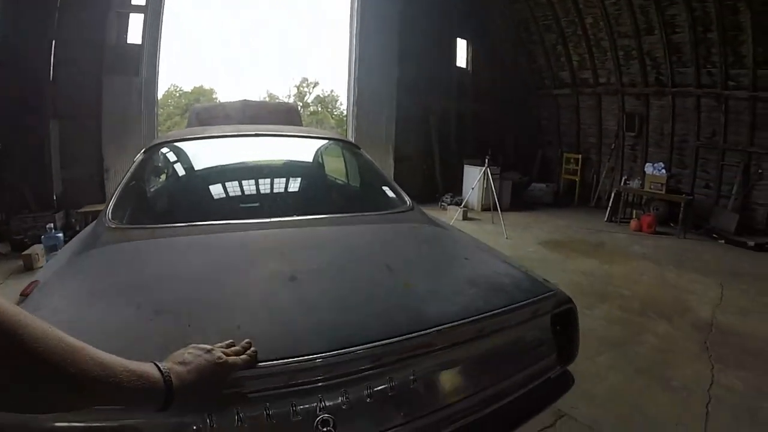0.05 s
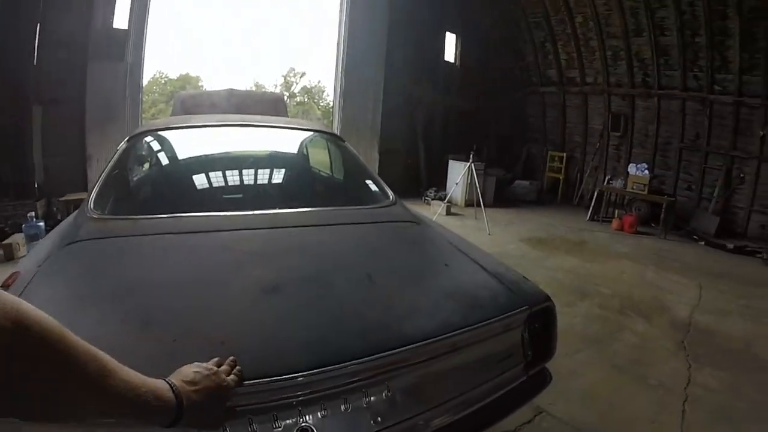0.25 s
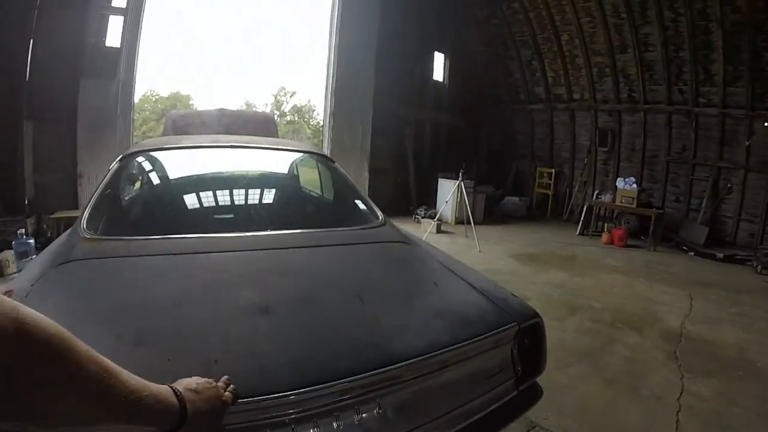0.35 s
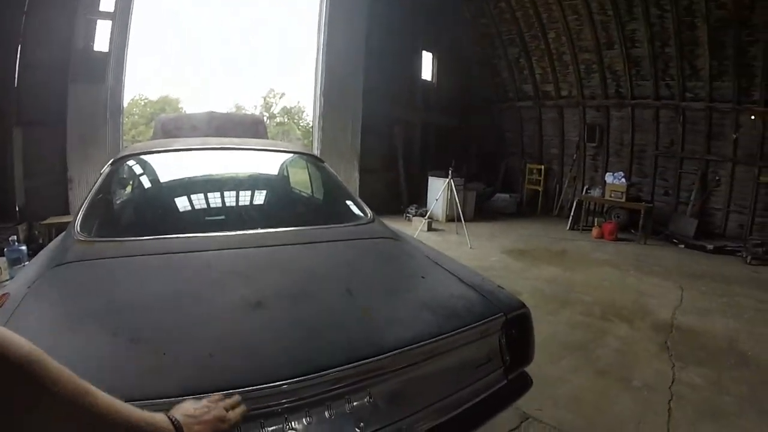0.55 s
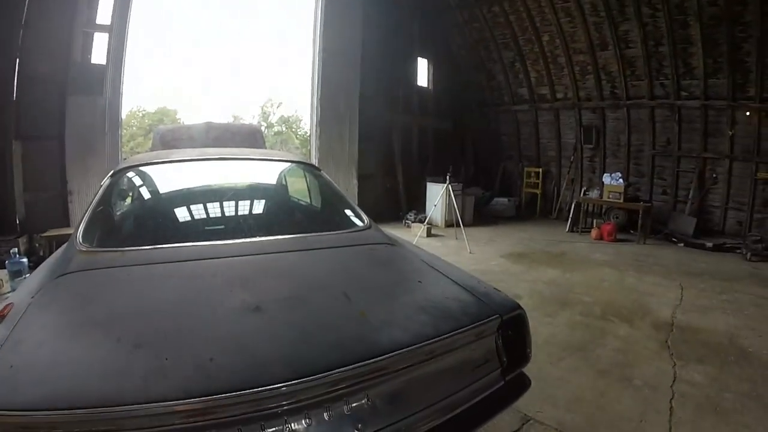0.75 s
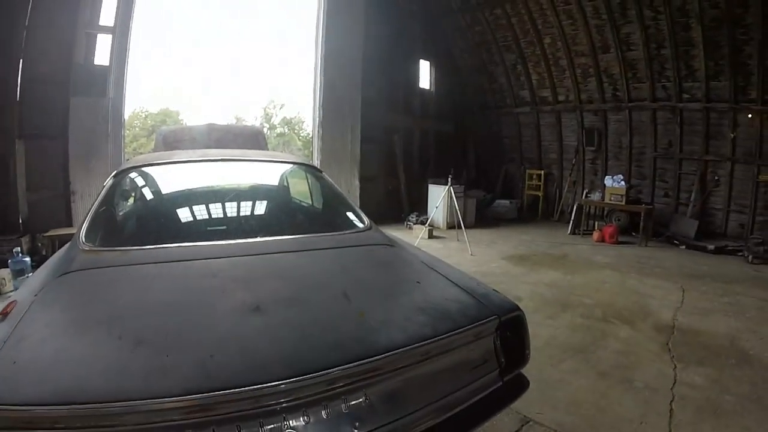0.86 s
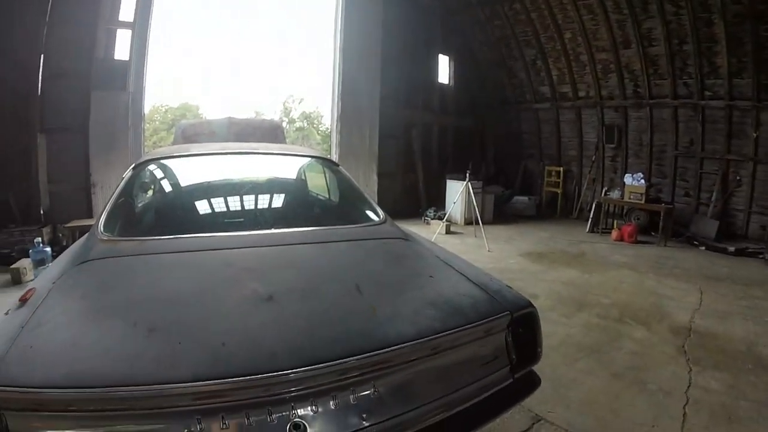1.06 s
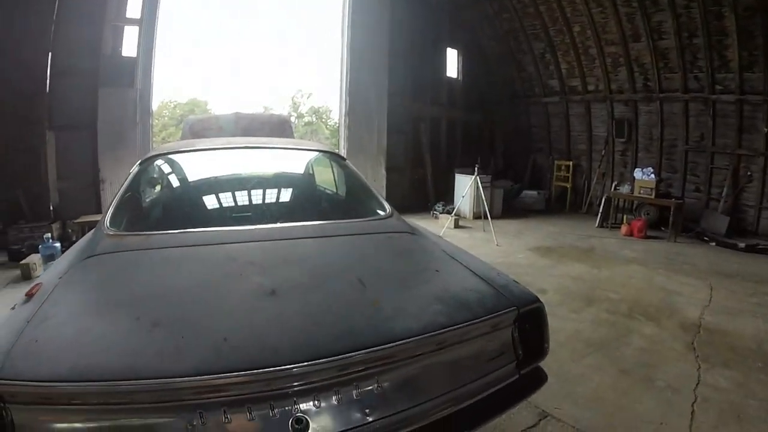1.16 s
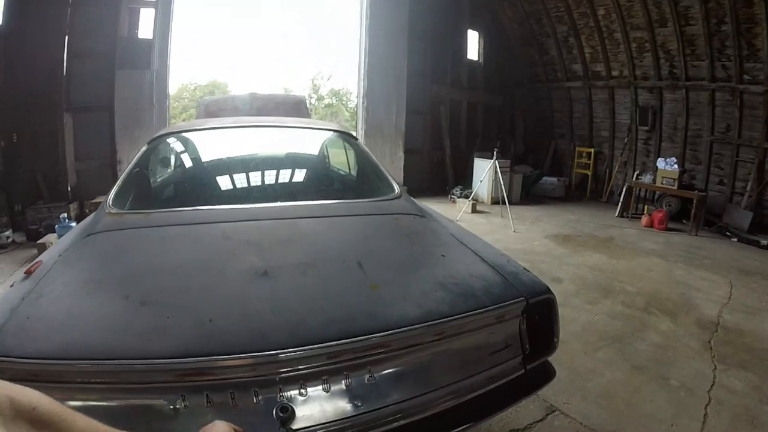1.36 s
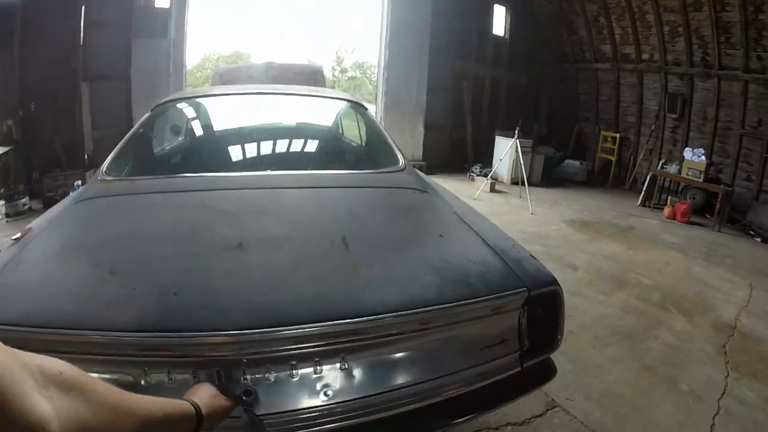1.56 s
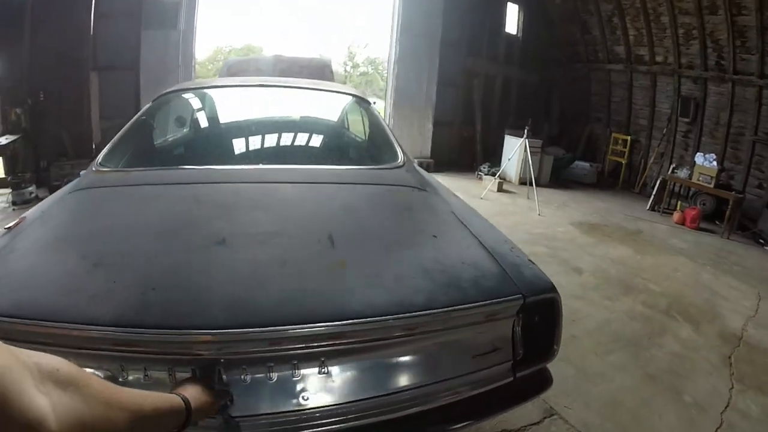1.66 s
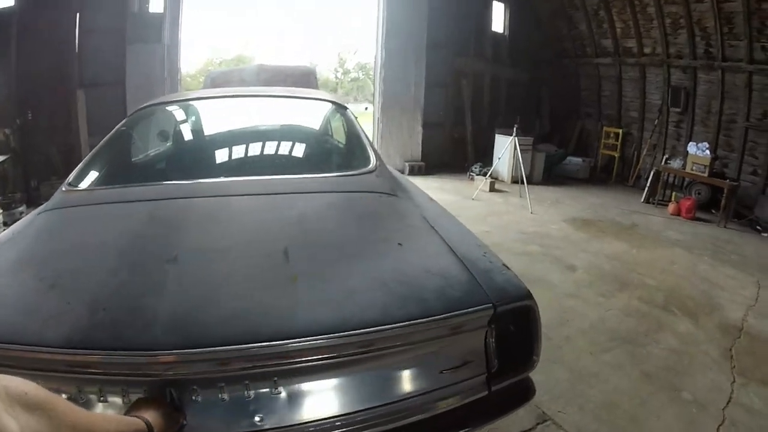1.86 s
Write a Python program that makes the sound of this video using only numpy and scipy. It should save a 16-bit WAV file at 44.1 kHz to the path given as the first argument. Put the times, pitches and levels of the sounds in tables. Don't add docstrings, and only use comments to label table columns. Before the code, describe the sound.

Car trunk slammed hard, steel crash echoing through a large barn, followed by faint scuffs and key clicks

```python
import sys
import numpy as np
from scipy import signal
from scipy.fft import rfft, irfft
from scipy.io import wavfile

SR = 44100
rng = np.random.default_rng(int(sys.argv[2]) if len(sys.argv) > 2 else 0)


def unload_audio(sound):
    columns = np.transpose(np.atleast_2d(sound))
    steps = np.round(np.clip(columns, -1, 1) * 32767)
    wavfile.write(sys.argv[1], SR, steps.astype(np.int16))


def boost_factor(decibels):
    exponent = np.asarray(decibels, float) / 20
    return 10 ** exponent


N = 83790


def rms_one(x):
    return x / np.sqrt(np.mean(x ** 2) + 1e-20)


def at_hz(points, hz):
    table_hz, values = np.transpose(points)
    return np.interp(np.log(hz), np.log(table_hz), values)


def colour(x, spectrum):
    hz = np.maximum(np.fft.rfftfreq(len(x), 1 / SR), 5)
    return rms_one(irfft(rfft(x) * boost_factor(at_hz(spectrum, hz)), len(x)))


def dull(x, cut_hz):
    return signal.sosfilt(signal.butter(4, min(cut_hz, .45 * SR), fs=SR, output="sos"), x)


def resonate(x, hz, width_hz):
    r = np.exp(-np.pi * width_hz / SR)
    poles = [1, -2 * r * np.cos(2 * np.pi * hz / SR), r * r]
    return signal.lfilter([(1 - r * r) / 2, 0, (r * r - 1) / 2], poles, x + 1e-18)


def ring(clicks, hz, t60):
    r = boost_factor(-60 / (t60 * SR))
    w = 2 * np.pi * hz / SR
    return signal.lfilter([0, np.sin(w)], [1, -2 * r * np.cos(w), r * r], clicks + 1e-18)


def drift(rate_hz):
    r = np.exp(-2 * np.pi * rate_hz / SR)
    wander = signal.lfilter([1], [1, -2 * r, r * r], rng.standard_normal(N + SR))
    return rms_one(wander[SR:])


def grains(per_s, spread_db):
    sizes = boost_factor(spread_db * np.minimum(rng.exponential(1, N), 4)) * rng.choice([-1, 1], N)
    return rms_one(sizes * (rng.random(N) < per_s / SR))


def stroke(s, length, dying, fade_s):
    u = np.maximum(np.arange(N) / SR - s, 0)
    attack = np.minimum(u / 0.00033, 1)
    return attack * np.exp(-dying * np.minimum(u / length, 1) - np.maximum(u - length, 0) / fade_s)


def body(x, peaks, widen, broad_db):
    bed = signal.sosfilt(signal.butter(2, peaks[0][0] * .7, "high", fs=SR, output="sos"), x)
    out = boost_factor(broad_db) * signal.lfilter([.3], [1, -.7], bed)
    for k, (hz, width_hz, db) in enumerate(peaks):
        out = out + (-1) ** k * boost_factor(db) * resonate(x, hz, width_hz * widen)
    return out


def contacts(rows, peaks, per_s, widen, broad_db):
    clicks = grains(per_s, spread_db=1.5)
    scale = np.std(body(clicks, peaks, widen, broad_db))
    force = np.zeros(N)
    for s, length, db, dying, cut_hz in rows:
        force += boost_factor(db) * dull(clicks * stroke(s, length, dying, fade_s=0.0042), cut_hz)
    return body(force, peaks, widen, broad_db) / scale


# f/Hz, level/dB
AIR_HISS = [(12, -53), (20, -1.5), (129, -3.5), (225, -9.5), (404, -7.5), (565, -14), (3960, -27),
            (4950, -29.5), (15500, -49)]


def outdoors():
    insect_hz, width_hz = 5000, 410
    song = resonate(rng.standard_normal(N), insect_hz, width_hz)
    song = rms_one(resonate(song, insect_hz, width_hz))
    hiss = colour(rng.standard_normal(N), AIR_HISS)
    return boost_factor(-51) * hiss + boost_factor(-66 + 0.5 * drift(8.2)) * song


# f/Hz, t60/s
BARN_DECAY = [(30, 0.7), (120, 1.76), (250, 1.7), (600, 1.17), (2000, 1.37), (5000, 1.09), (10000, .5),
              (15000, 1)]
# f/Hz, level/dB
BARN_LEVEL = [(30, -1.5), (150, 1.5), (240, -1), (400, -1.5), (700, -13), (1100, -11), (1800, -7.5),
              (4000, -10), (15000, -12.5)]


def barn(x):
    t = np.arange(N) / SR
    first_echo_s = 0.0046
    edges = 20 * 2 ** np.arange(0, 9.8, .5)
    white = rng.standard_normal((2, N))
    echo = np.zeros(N)
    for k, (low, high) in enumerate(zip(edges, edges[1:])):
        hz = np.sqrt(low * high)
        t60 = at_hz(BARN_DECAY, hz)
        band = signal.sosfilt(signal.butter(2, [low, high], "band", fs=SR, output="sos"), white[k % 2])
        even_energy = np.sqrt(2 * np.log(1000) / t60 / SR)
        echo += band * boost_factor(at_hz(BARN_LEVEL, hz) - 60 * t / t60) * even_energy
    return signal.fftconvolve(x, echo * np.clip(t / first_echo_s - 1, 0, 1))[:N]


# t/s, length/s, level/dB, dying over the length, dull above f/Hz
LATCH_TOUCH = [(.1942, 0.0085, -35, 1.9, 9100)]
# f/Hz, width/Hz, level/dB
LATCH_METAL = [(2450, 100, -8), (3520, 630, 9.5), (5250, 74, 12.5), (6600, 150, 15), (8600, 330, -18),
               (10400, 130, -33)]


def latch_tick():
    return contacts(LATCH_TOUCH, LATCH_METAL, 6000, widen=2.2, broad_db=-12)


# t/s, length/s, level/dB, dying over the length, dull above f/Hz
HAND_SCUFFS = [
    (.9095, 0.018, -37.5, 0.32, 8300),
    (.9175, 0.00086, -35, 1.3, 9100),
    (.936, .002, -59, 1.3, 11000),
    (.95, 0.021, -48.5, 0.36, 3000),
    (1.088, 0.0033, -36.5, 1.2, 1500),
    (1.45, 0.56, -57.5, 0.074, 1840),
]
# f/Hz, width/Hz, level/dB
TRIM_PANEL = [(536, 170, 3), (1070, 200, 6.5), (1580, 140, 4.5), (2200, 290, 4), (2880, 320, -1),
              (3660, 210, -3), (6200, 280, -25)]


def hand():
    knock = np.zeros(N)
    knock[int(.8362 * SR)] = -boost_factor(-24)
    scuffs = contacts(HAND_SCUFFS, TRIM_PANEL, 12000, widen=2.5, broad_db=-9)
    return ring(knock, 270, t60=.014) + scuffs


# f/Hz, width/Hz, level/dB
KEY_SCRAPES = [(1.391, 0.0065, -40.5, 0.54, 3200), (1.398, 0.013, -45.5, 0.45, 6560),
               (1.417, .018, -48.5, 0.1, 5500), (1.435, 0.013, -52.5, -0.53, 8000),
               (1.48, 0.014, -52, 0.88, 2000)]
KEYWAY = [(1130, 23, -13), (1680, 55, 5.5), (2200, 49, 4), (3000, 79, 2.5), (3670, 110, -7),
          (4900, 41, -10), (6100, 25, -13)]
BARREL_TURN = [(1.738, 0.035, -42.5, -.3, 2040), (1.765, 0.018, -35.5, -0.15, 4300),
               (1.781, 0.012, -31, 0.4, 6430), (1.795, 0.031, -40, 0.59, 6000),
               (1.815, 0.038, -45.5, -0.15, 2500), (1.846, 0.016, -38.5, 0.54, 2000)]
BARREL = [(560, 60, 0), (1000, 80, -3), (1500, 40, 2), (2120, 60, -3), (3240, 60, -4), (4194, 60, -5),
          (6500, 200, -9)]
PIN_SNAPS = [(1.7815, 0.0037, -40.5, 3.1, 10000), (1.8688, .003, -45.5, 2.2, 11000)]
PIN_METAL = [(6000, 300, 0), (7000, 300, 2), (8300, 370, -1), (10000, 300, -10)]
LOCK_RELEASE = [
    (1.8691, 0.0089, -22.5, 1.05, 5000),
    (1.881, 0.017, -36.5, 1.3, 3550),
]
LOCK_CASE = [(546, 54, 9.5), (860, 120, 9), (1130, 78, 11.5), (1600, 115, 4), (2170, 43, 2.5),
             (2980, 81, 1.5), (3780, 110, -9.5)]
BLADE_TICKS = [(1.7785, 0.011, -49.5, 3.7, 16000), (1.8345, 0.008, -58, 3.1, 16000)]
KEY_BLADE = [(8000, 310, 10), (10470, 60, 27), (11800, 250, 17), (13400, 150, 16), (14500, 500, 15)]


def key_and_lock():
    return (contacts(KEY_SCRAPES, KEYWAY, 9000, widen=3.5, broad_db=-4.5)
            + contacts(BARREL_TURN, BARREL, 9000, widen=5, broad_db=-3)
            + contacts(PIN_SNAPS, PIN_METAL, 24000, widen=1.2, broad_db=-25)
            + contacts(LOCK_RELEASE, LOCK_CASE, 6000, widen=2.2, broad_db=-6)
            + contacts(BLADE_TICKS, KEY_BLADE, 12000, widen=1.4, broad_db=-24.5))


# t/s, bar hum level/dB, rubbing level/dB
HINGE_TRAVEL = [(0, -50.5, -53), (.064, -48.5, -60), (0.068, -53, -38), (.08, -52, -42), (.12, -44.5, -39),
                (.16, -42, -39), (0.188, -29, -38.5), (0.211, -24.5, -41.5), (0.24, -21.5, -44),
                (0.263, -22, -45)]
# f/Hz, width/Hz, level/dB
HINGE_RUB = [(232, 60, 5), (694, 97, 10.5), (1220, 58, 7), (1580, 135, 5), (2500, 43, -2), (3235, 24, 2.5),
             (5000, 230, -15), (6870, 200, -18)]


def hinges():
    t = np.arange(N) / SR
    s, hum_db, rub_db = np.transpose(HINGE_TRAVEL)
    bar_hz, rise_hz_per_s, beat_hz, beat_depth = 445.5, 311, 31, 0.76
    since_null = t - .215
    hz = (bar_hz + rise_hz_per_s * np.clip(since_null, -.07, .1)) * (1 + .015 * drift(25))
    phase = 2 * np.pi * np.cumsum(hz) / SR
    beat = beat_depth * np.sin(np.pi * beat_hz * since_null)
    hum = np.sin(phase) * beat + np.cos(phase) * (1 - beat_depth)
    hum = rms_one(hum * boost_factor(3 * drift(86)))
    rub = body(grains(6000, spread_db=2.5), HINGE_RUB, widen=2.23, broad_db=-7)
    rub = rms_one(dull(rub, 6700)) * boost_factor(2 * drift(35))
    hum_level = boost_factor(np.interp(t, s, hum_db, right=-120))
    rub_level = boost_factor(np.interp(t, s, rub_db, right=-120))
    return hum * hum_level + rub * rub_level


# t/s, f/Hz, peak level/dB, t60/s
AIR_PUSH = (.2605, 56, -1, .11)
# t/s, f/Hz, peak level/dB, t60/s
BODY_THUMPS = [(.29, 35, -16.5, 0.92), (.3015, 80.7, -11.5, 0.096), (.3, 118, -20, 0.56),
               (0.44, 62, -24, 0.36), (0.35, 47, -31.5, 2.18), (.288, 482, -7, 0.081),
               (.3, 312, -17.5, 0.32), (.3, 270, -23, 0.17), (.41, 400, -27.5, 0.17),
               (.258, 1090, -6.5, 0.057)]


def thumps():
    out = np.zeros(N)
    for s, hz, db, t60 in [AIR_PUSH, *BODY_THUMPS]:
        u = np.maximum(np.arange(N) / SR - s, 0)
        soft_start = 1 - np.exp(-u / .003)
        out -= boost_factor(db - 60 * u / t60) * np.sin(2 * np.pi * hz * u) * soft_start
    return out


# t/s, chatter length/s, level/dB, dull above f/Hz
LID_BLOWS = [(0.2522, 0.02, -17, 15000), (.255, 0.0073, -14, 7900), (.2625, 0.0089, -11, 3000),
             (.269, 0.011, -10, 15300), (.281, 0.012, -17, 12000), (.292, 0.0082, -16, 10500),
             (.306, 0.0058, -15.5, 2500), (0.316, 0.0086, -23.5, 14100), (.33, 0.0056, -22.5, 4000),
             (0.3457, 0.0035, -21, 10900), (.351, 0.0091, -17.5, 7000), (.364, 0.0053, -26, 6000)]
# f/Hz, level per Hz/dB
CRASH_COLOUR = [(88, -35), (150, -9), (561, -8), (766, -11), (1240, -10.5), (1700, -13.5), (1940, -17),
                (10100, -35), (15500, -50)]
# f/Hz, width/Hz, level/dB
STEEL_RINGING = [(3200, 46, 1), (3780, 170, -6.5), (5000, 370, -10), (5500, 13, -21), (6600, 66, -6.5),
                 (10500, 29, -12), (12400, 46, -29)]
# f/Hz, level/dB, t60/s
LID_MODES = [(244, -20.5, 0.82), (337, -22.5, 0.3), (470, 0.5, 0.042), (685, -13, 0.31), (787, -30, 0.95),
             (936, -16.5, 0.34), (1091, -13.5, 0.3), (1247, -20.5, 1), (1310, -36, 0.89),
             (1682, -19.5, 0.41), (2090, -43, 0.52), (2310, -16, 0.13), (2444, -34, 0.47),
             (2656, -23, 0.25)]


def slam(blows):
    clicks = grains(22000, spread_db=1.5)
    crash = colour(clicks, CRASH_COLOUR)
    out, force = np.zeros(N), np.zeros(N)
    for s, length, db, cut_hz in blows:
        chatter = boost_factor(db) * stroke(s, length, 0.58, fade_s=.006)
        out += dull(crash * chatter, cut_hz)
        force += dull(clicks * chatter, cut_hz)
    for hz, width_hz, db in STEEL_RINGING:
        out += boost_factor(db - 1) * resonate(force, hz, 3 * width_hz)
    luck_db = rng.normal(0, 3, (len(blows), len(LID_MODES)))
    for k, (hz, mode_db, t60) in enumerate(LID_MODES):
        taps = np.zeros(N)
        for (s, _, db, _), chance_db in zip(blows, luck_db[:, k]):
            taps[int(s * SR)] = boost_factor(mode_db + db + 1 + chance_db)
        out += ring(taps, hz, t60 * 0.32)
    return out


def scene():
    left, right = slam(LID_BLOWS[::2]), slam(LID_BLOWS[1::2])
    small = latch_tick() + hand() + key_and_lock()
    hinge, low = hinges(), thumps()
    echo = barn(left + boost_factor(-14) * low + boost_factor(-40) * hinge)
    echo = echo + barn(right + boost_factor(-1) * small)
    return (left + right + low + small + hinge + echo + outdoors())[None]


def roll_off(x):
    return signal.sosfilt(signal.butter(12, 16250, fs=SR, output="sos"), x)


def record(dry):
    ceiling = .95
    rounded = ceiling * np.tanh(dry / ceiling)
    mix = signal.sosfilt(signal.cheby2(10, 60, 17200, fs=SR, output="sos"), rounded)
    return roll_off(mix)


dry = scene()
out = record(dry)
unload_audio(out)
```